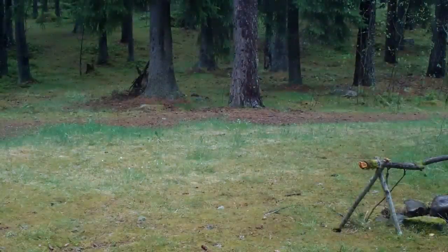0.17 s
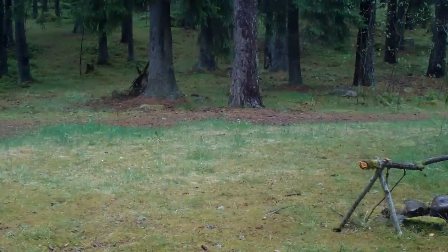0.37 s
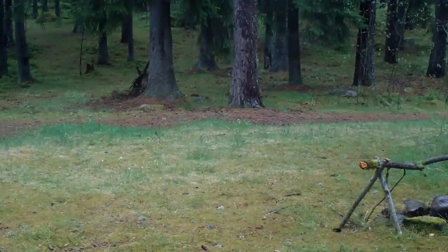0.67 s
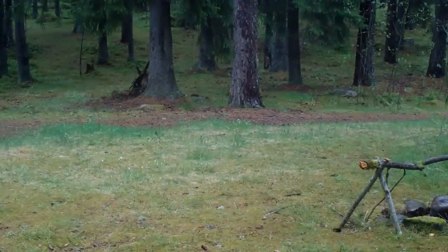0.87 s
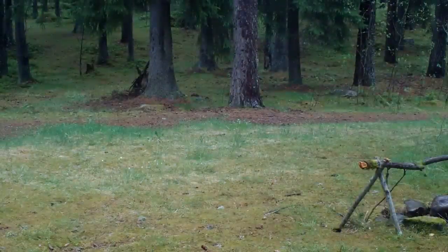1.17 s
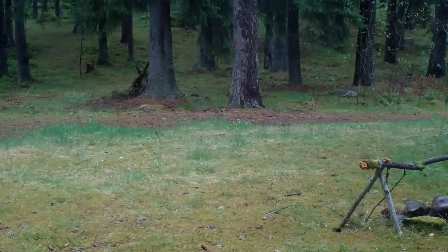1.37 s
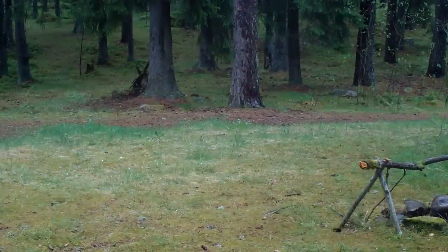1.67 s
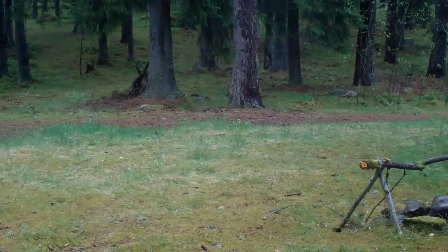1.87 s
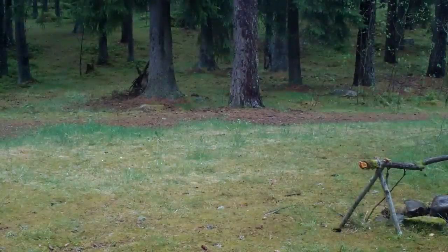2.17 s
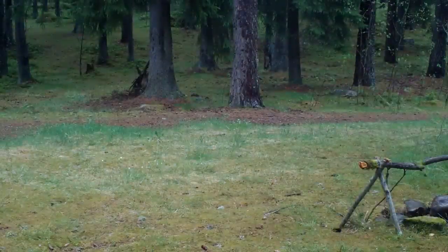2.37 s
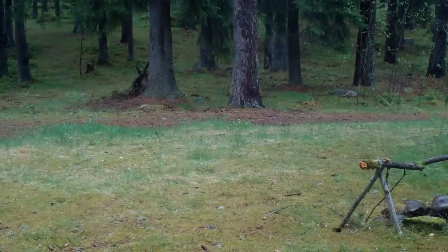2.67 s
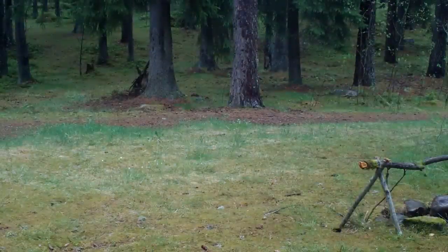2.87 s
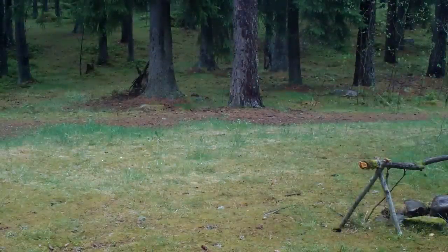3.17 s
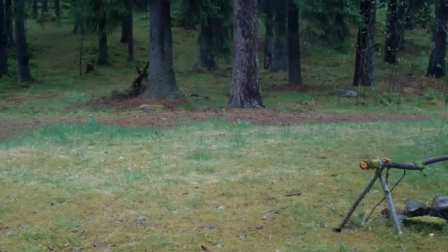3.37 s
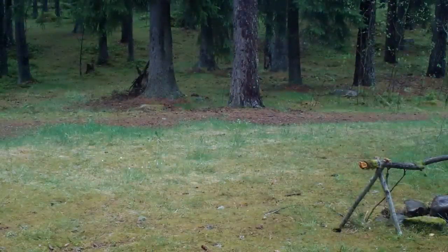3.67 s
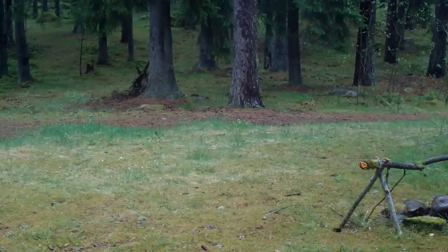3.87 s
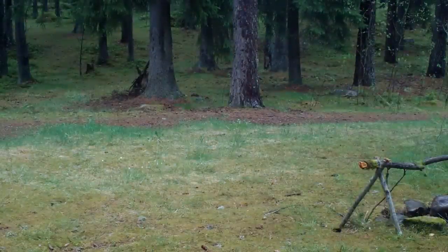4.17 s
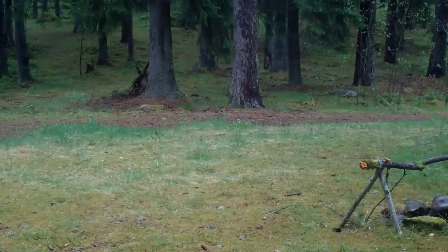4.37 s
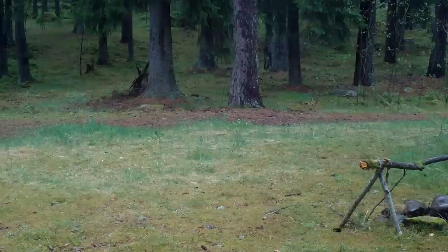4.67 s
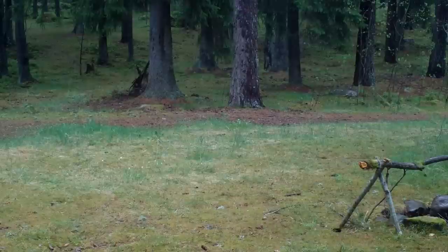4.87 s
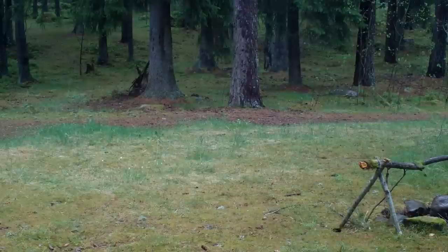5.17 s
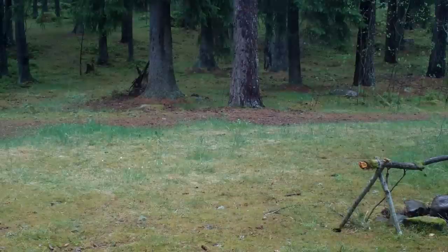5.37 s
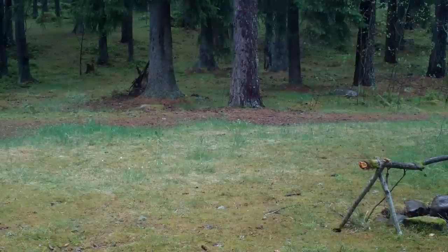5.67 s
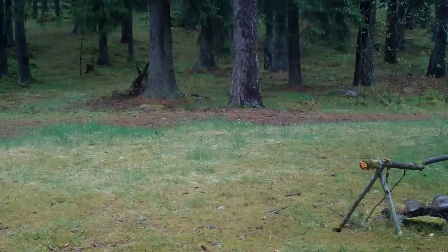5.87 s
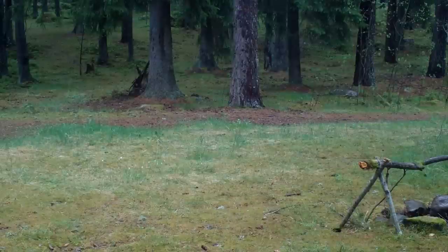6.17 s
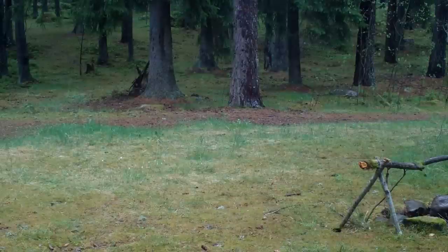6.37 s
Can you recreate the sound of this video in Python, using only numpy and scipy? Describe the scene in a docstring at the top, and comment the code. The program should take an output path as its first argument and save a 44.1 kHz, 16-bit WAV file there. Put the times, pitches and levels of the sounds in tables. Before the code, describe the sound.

Arrows are pushed into a leather quiver up close, with bright clicks, scrapes and one dense rattling burst, in a quiet forest with a distant bird.

```python
"""Arrows pushed into a leather quiver, close to the microphone, in a quiet forest clearing.
Shafts click and chatter (coloured impulse bursts), scrape (random tiny slips) and ring (decaying modes).
Glancing blows chirp along a bent shaft; tips knock and drag in the hollow leather, heard as resonances.
Behind lie a far songbird (gliding, warbled sines with echoes) and forest air with a thin hiss (shaped noise)."""
import sys
import numpy as np
from scipy import signal
from scipy.fft import rfft, irfft, next_fast_len
from scipy.io import wavfile
from scipy.ndimage import uniform_filter1d

SR = 44100
rng = np.random.default_rng(int(sys.argv[2]) if len(sys.argv) > 2 else 0)


def persist_wave(psi):
    """Save psi, clipped to +-1, as 16-bit WAV."""
    counts = np.round(np.clip(psi, -1, 1) * 32767).astype(np.int16)
    wavfile.write(sys.argv[1], SR, np.atleast_2d(counts).T)


N = 287973
T = np.arange(N) / SR

# Clear clicks of shaft on shaft: start_s, level_db (rms over 10 ms),
# chatter_s (half the time of the chatter's fall to 1/e), woody_low_db, sharp_top_db (both added to the spectrum)
SHAFT_CLICKS = [(0.0294, -44, 0.0036, 4.5, 1), (0.4006, -37.5, 0.0022, 5.5, 8), (0.434, -44, .0017, 6, 0),
                (0.462, -39.5, 0.003, 4, 7), (0.4943, -35, .0024, 7, 9), (0.535, -26, 0.0015, 0, 7.5),
                (0.556, -39, .006, 17, 2), (0.5653, -32, 0.0025, 5, 7), (0.5796, -36.5, 0.0032, 17.5, 3),
                (0.5864, -36.5, 0.0024, 12, 3), (0.6171, -33.5, 0.00019, 2, 0),
                (0.6396, -39, 0.0039, -2, -3), (0.6557, -42, 0.00054, -1, -5),
                (1.7003, -30.5, 0.00043, -2, 2), (1.7212, -37, 0.004, 10, 4),
                (1.7293, -35, 0.0015, 10.5, 6), (2.1074, -33, 0.0021, -5, 2),
                (2.1336, -31.5, 0.00055, 3, 7), (2.1384, -26, 0.0023, -1, 5), (2.158, -35, 0.0017, 2, 11),
                (2.668, -40.5, 0.0009, 3, -3), (3.0693, -52.5, .0005, 14, -6),
                (3.2995, -47.5, 0.00068, 11, 0), (3.6788, -30.5, 0.00095, 5, 6),
                (3.6876, -35.5, 0.0012, 0, 6), (3.7049, -45, .001, 8, -3), (3.719, -40, 0.00034, -4, -8),
                (3.77, -35.5, 0.00055, -10, 4), (3.7835, -32.5, 0.00059, 0, 4),
                (3.798, -40, 0.00023, -8, -6), (3.863, -32, 0.0024, -10, 9), (3.9146, -40.5, 0.00049, 3, 8),
                (3.9725, -36, 0.0065, -19, 3), (3.992, -41, 0.0023, -11, 19),
                (4.3057, -24.5, 0.0028, -1, 8), (4.3738, -28.5, 0.0021, -7, -2),
                (4.3805, -24.5, 0.003, -1, 3), (4.391, -23.5, 0.0028, -3, 0),
                (4.3954, -19, 0.0041, -0.5, 7), (4.4213, -23.5, 0.0036, -5, 11),
                (4.4509, -23.5, 0.0034, -3, 11), (4.4565, -26, 0.0044, -12, 13),
                (4.4953, -22, 0.014, -3, 6), (4.5238, -27.5, 0.0061, 6, -3), (4.5474, -22, 0.0038, -1, 9),
                (4.5777, -29.5, 0.016, 4.5, 7), (4.5982, -31, 0.0026, -2, 9), (4.608, -29.5, 0.014, 5.5, 2),
                (4.6318, -28, 0.0026, -9, 8), (4.7113, -43, 0.0032, 2, -8), (4.7178, -41, 0.0022, -1, 0),
                (5.051, -30.5, 0.0029, 4.5, 2), (5.1628, -45, 0.0026, 13, -5), (5.3667, -32, 0.0035, 4, -2),
                (5.3892, -35.5, 0.00053, -4, 5), (5.401, -37, 0.0015, 0, -3),
                (5.4052, -30, 0.0021, -4.5, -4), (5.4193, -37, 0.0015, 6, -1),
                (5.4303, -42.5, 0.0024, 8, 3), (5.471, -41, 0.00042, -7, -2),
                (5.4961, -40.5, 0.0012, 1.5, 3), (5.6429, -38.5, 0.01, 10, 7),
                (5.6548, -19, 0.00033, 1.5, 4), (5.697, -31.5, 0.0026, 1, 3), (5.726, -36, 0.0019, 2, 0),
                (5.7414, -41.5, 0.00035, -1, 6), (5.7555, -43, .0016, -3, 1), (5.904, -51, .0003, 8, 3),
                (5.944, -50, .0003, 2, 4), (6.337, -49.5, 0.001, -1, -1)]
# Common click spectrum: pitch_hz, level_db (relative)
CLICK_SPECTRUM = [(100, -32.5), (400, -27), (1000, -22), (2300, -19.5), (3200, -20), (4500, -15.5),
                  (5800, -7), (6700, -0.5), (7300, 4), (7900, -2), (8700, -9), (10500, -17), (13000, -25.5),
                  (16000, -28)]
# The clicks sink in pitch overall as the arrows settle: time_s, brightest_pitch_hz
CLICK_PITCH = [(3.9, 7670), (4.4, 7380), (5.45, 7300), (5.68, 7000), (5.73, 7150)]
# Shafts and feathers sliding along each other: start_s, length_s (until the release), level_db (of the effort)
SLIDING_STROKES = [(0.29, 0.19, -61), (0.462, 0.095, -47.5), (0.745, 0.091, -60), (1.7, 0.032, -47),
                   (1.85, 0.061, -52), (2.09, 0.064, -44.5), (2.38, 0.087, -55), (2.61, 0.11, -61),
                   (2.965, 0.035, -51.5), (3.2, 0.046, -61.5), (3.48, 0.29, -62.5), (3.848, 0.032, -48.5),
                   (3.92, 0.1, -51.5), (4.04, 0.082, -58), (4.29, 0.054, -45), (4.395, 0.023, -29),
                   (4.427, 0.042, -24.5), (4.482, 0.052, -27.5), (4.55, 0.013, -31), (4.575, 0.089, -46),
                   (5.05, 0.19, -64.5), (5.365, 0.042, -56), (5.63, 0.12, -61)]
# Spectrum of shafts sliding: pitch_hz, level_db (relative)
SCRAPE_SPECTRUM = [(200, -19), (1000, -25.5), (2300, -17), (3500, -14), (5000, -9), (6300, -3), (7300, 4),
                   (8000, -1.5), (8800, -7.5), (10500, -18), (13000, -22), (16000, -50)]
# Spectrum of brushing feathers: pitch_hz, level_db (relative)
FEATHER_SPECTRUM = [(800, -14), (3300, -3), (5500, -4.5), (7300, 7.5), (15000, -17)]
# Bending modes of the shafts: pitch_hz, level_db (relative), t60_s
SHAFT_MODES = [(1840, -4, 0.12), (2270, 4.5, 0.092), (2890, -5, 0.14), (3880, -24, .04), (4840, 0, 0.058),
               (5500, 2.5, 0.072), (6920, 0.5, 0.041), (7370, -6.5, 0.34), (7970, -3, 0.2),
               (9650, 5, 0.091)]
# Glancing blows that bend a shaft: start_s, peak_db (of the chirp alone), travel_s (of its 1 kHz wave)
SHAFT_FLEXES = [(0.5816, -39, 0.002), (0.586, -50, .0015), (1.7003, -40.5, .012), (5.0494, -35, 0.00187),
                (5.6543, -32.5, .001)]
# Blows on the leather: start_s, peak_db
LEATHER_KNOCKS = [(1.718, -34), (2.139, -42.5), (3.68, -37.5), (4.375, -28), (4.381, -26), (4.391, -24.5),
                  (4.413, -25.5), (4.422, -24.5), (4.434, -26), (4.487, -30.5), (4.538, -34), (4.577, -36),
                  (4.625, -32), (4.712, -38), (6.337, -39)]
# Tips dragging on the inside of the quiver: start_s, length_s (until the release), level_db (of the effort)
TIP_DRAGS = [(3.97, 0.23, -49.5), (4.374, 0.084, -36), (4.484, 0.027, -40), (4.52, 0.12, -52)]
# Modes of the leather tube and its air, before softening: pitch_hz, level_db (relative), t60_s
QUIVER_MODES = [(139, 1, 0.044), (230.6, -5.5, 0.11), (293, -3, 0.036), (379, 3.5, 0.036),
                (615, -0.5, 0.059), (830, -3, 0.0081), (1060, -11, 0.0053)]
# Songbird whistles: start_s, length_s, start_hz, middle_hz, end_hz, peak_db (before echoes)
BIRD_WHISTLES = [(1.097, 0.079, 2230, 2280, 2230, -64), (1.264, 0.15, 1940, 2000, 1960, -64),
                 (1.472, .12, 3000, 2800, 3130, -61), (1.545, .09, 3400, 3540, 3370, -66.5),
                 (1.8, 0.085, 2960, 2810, 2610, -63), (2.235, .073, 2790, 2630, 2980, -63),
                 (2.267, 0.08, 2680, 2340, 2200, -61), (2.35, .27, 2310, 2190, 2290, -65)]
# Low notes are warbled, high notes nearly pure: middle_hz, warble (share of the pitch)
WARBLE_DEPTH = [(2200, 0.0437), (2700, 0.0055)]
# Forest air and high hiss: pitch_hz, level_db (relative, per hz)
AIR_SPECTRUM = [(15, -1.5), (28, 1.5), (42, -1.5), (62, -3.5), (110, -11.5), (220, -19), (450, -20.5),
                (850, -21.5), (1400, -29.5), (3000, -36), (5000, -37.5), (6400, -34), (7400, -28),
                (9200, -38.5), (15000, -44)]

FIDGET_DB = -65.5  # effort of the held arrows, never quite still
USUAL_STROKE_DB = -50
ATTACK_S, RELEASE_S = 0.012, 0.024  # swell, and fall to 1/e, of a usual stroke
HASTE = 0.46  # dB of extra speed per dB of extra stroke level
AIR_DB = -48.5  # rms before the slow swaying
TOP_HZ = 15800


def taps(first_hit=1.1, after_db=-21, after_s=0.0088, travel_s=0.001014, size=4096):
    """Each contact is a sharp hit, a quick chatter, then a weak tail of waves running along the shaft."""
    out = np.zeros(N)
    t = np.arange(size) / SR
    hz, click_db = np.transpose(CLICK_SPECTRUM)
    woody = np.interp(hz, [2800, 6000], [1, 0])
    sharp = np.interp(hz, [7900, 11000], [0, 1])
    # Low bending waves are slow and arrive after the bright tick; travel_s is the delay of the lowest
    f = np.fft.rfftfreq(size, 1 / SR)
    late = np.exp(-2j * np.pi * travel_s * 2400 * (1 - np.exp(-f / 2400)))
    tail = undb(after_db) * np.exp(-t / after_s)
    for start_s, level_db, chatter_s, low_db, top_db in SHAFT_CLICKS:
        grains = rng.choice([-1, 1], size) * (rng.random(size) < .5)
        # Holds while the shafts touch, then stops
        chatter = np.exp(-(t / (2 * chatter_s)) ** 2)
        force = grains * (chatter + tail)
        force[0] += first_hit
        # Shift the whole spectrum so that its peak lies at the brightest pitch
        bright_hz = np.interp(start_s, *np.transpose(CLICK_PITCH))
        shifted_hz = hz * bright_hz / hz[np.argmax(click_db)]
        tilted_db = click_db + low_db * woody + top_db * sharp
        click = colour(irfft(rfft(force) * late), np.transpose([shifted_hz, tilted_db]))
        rms_10ms = np.linalg.norm(click) / np.sqrt(SR / 100)
        add(out, start_s, click * undb(level_db) / rms_10ms)
    return out


def slide(catch_db=2.5, brush_db=-8, brush_top_db=-55, tick_db=-4, tick_top_db=-46):
    """Shafts rub, catching and letting go; feathers add duller brushing and stray ticks, capped in level."""
    push = effort(SLIDING_STROKES) + undb(FIDGET_DB)
    rub = friction(push, rate=4000, spread_db=5.5) * undb(catch_db * walk(130))
    scrape = colour(rub, SCRAPE_SPECTRUM) / power_gain(SCRAPE_SPECTRUM)
    # Hard pressure hardly raises the feathers
    brush_push = np.minimum(push * undb(brush_db), undb(brush_top_db))
    tick_push = np.minimum(push * undb(tick_db), undb(tick_top_db))
    brush = friction(brush_push, rate=2500, spread_db=5.5)
    ticks = friction(tick_push, rate=80, spread_db=6)
    feathers = colour(brush + ticks, FEATHER_SPECTRUM) / power_gain(FEATHER_SPECTRUM)
    return scrape + feathers


def flexes(ring_db=-12, size=2048):
    """Bending waves travel as the root of frequency: a short falling chirp that leaves the shaft ringing."""
    out = np.zeros(N)
    khz = np.fft.rfftfreq(size, 1 / SR) / 1000
    band = khz / (.5 + khz) / (1 + (khz / 2.54) ** 4)
    for start_s, peak_db, travel_s in SHAFT_FLEXES:
        lag = 4000 * np.pi * travel_s * np.sqrt(khz)  # phase in radians
        chirp = irfft(band * np.exp(-1j * lag))
        add(out, start_s, undb(peak_db) * chirp / np.abs(chirp).max())
    return out + undb(ring_db) * excite(out, ring(SHAFT_MODES))


def quiver(soft_hz=1300, crumple_s=0.0052, size=4096):
    """Tips knock and drag inside the leather tube, which answers with a dull hollow note."""
    out = np.zeros(N)
    t = np.arange(size) / SR
    soften = signal.butter(1, soft_hz, fs=SR, output="sos")
    body = signal.sosfilt(soften, ring(QUIVER_MODES))
    for start_s, peak_db in LEATHER_KNOCKS:
        crumple = 0.17 * rng.standard_normal(size) * np.exp(-t / crumple_s)
        knock = excite(signal.unit_impulse(size) + crumple, body)
        add(out, start_s, undb(peak_db) * knock / np.abs(knock).max())
    drag = excite(friction(effort(TIP_DRAGS), rate=3000, spread_db=1), body)
    return out + colour(drag, [(120, -12), (240, -7.0), (400, -2), (900, -7.5), (3000, 1.0)])


def effort(strokes):
    """Each stroke swells, holds and dies away; hard strokes start and stop more quickly."""
    out = np.zeros(N)
    for start_s, length_s, level_db in strokes:
        speed = undb(HASTE * (level_db - USUAL_STROKE_DB))
        rise = np.clip((T - start_s) * speed / ATTACK_S, 0, 1)
        fall = np.exp(-np.maximum(T - start_s - length_s, 0) * speed / RELEASE_S)
        out = np.maximum(out, undb(level_db) * rise * fall)
    return out


def friction(gain, rate, spread_db):
    """Tiny random slips of unequal size, rate per second on average, as strong as the given gain."""
    sizes = undb(spread_db * np.minimum(rng.exponential(size=N), 3))
    slips = (rng.random(N) < rate / SR) * rng.choice([-1, 1], N) * sizes
    return unit(slips) * gain


def ring(modes, size=4096):
    """Impulse response of a struck body: decaying modes, cut at size samples, with unit energy."""
    t = np.arange(size) / SR
    y = np.zeros(size)
    for pitch_hz, level_db, t60_s in modes:
        decay = np.exp(-np.log(1000) * t / t60_s)
        y += undb(level_db) * np.cos(2 * np.pi * pitch_hz * t) * decay
    return y / np.linalg.norm(y)


def excite(x, response):
    """Play a force through an impulse response."""
    return signal.fftconvolve(x, response)[:len(x)]


def echoes(x, t60_s, size):
    """Diffuse fading reflections from ground and trees: decaying noise with unit energy."""
    tail = rng.standard_normal(size) * np.exp(-np.log(1000) * np.arange(size) / SR / t60_s)
    return excite(x, tail / np.linalg.norm(tail))


def bird(echo_t60_s=0.77, echo_db=-5, size=32768):
    """Arched and warbled whistles, smeared by echoes from the trunks."""
    out = np.zeros(N)
    wobble = walk(140)
    for start_s, length_s, start_hz, middle_hz, end_hz, peak_db in BIRD_WHISTLES:
        u = np.linspace(0, 1, int(length_s * SR))
        arch = np.polyval(np.polyfit([0, .5, 1], [start_hz, middle_hz, end_hz], 2), u)
        depth = np.interp(middle_hz, *np.transpose(WARBLE_DEPTH))
        pitch_hz = arch * (1 + depth * wobble[int(start_s * SR):][:len(u)])
        whistle = np.sin(2 * np.pi * np.cumsum(pitch_hz) / SR)
        add(out, start_s, undb(peak_db) * np.sin(np.pi * u) * whistle)
    return out + undb(echo_db) * echoes(out, echo_t60_s, size)


def air(gust_db=0.5, sway_db=1.15):
    """Forest hush with a thin high hiss, swaying slowly; the low rumble swells in light gusts."""
    hush = unit(colour(rng.standard_normal(N), AIR_SPECTRUM))
    rumble = signal.sosfilt(signal.butter(1, 90, fs=SR, output="sos"), hush)
    gusts = rumble * undb(gust_db * walk(6.1))
    hiss = (hush - rumble) * undb(sway_db * walk(3.15))
    return undb(AIR_DB) * (gusts + hiss)


def walk(rate):
    """Smooth random wander with a spread near 1, taking rate new values per second."""
    k = int(SR / rate)
    steps = np.repeat(rng.standard_normal(N // k + 1), k)
    return 1.75 * uniform_filter1d(steps, k)[:N]


def colour(x, points):
    """Causal filter with a (hz, db) spectrum, made from the cepstrum of its log gain."""
    hz, db = np.transpose(points)
    f = np.maximum(np.fft.rfftfreq(2 * next_fast_len(len(x)), 1 / SR), 1)
    log_gain = np.log(undb(np.interp(np.log(f), np.log(hz), db)))
    cepstrum = irfft(log_gain)
    # Fold the second half onto the first, for minimum phase
    cepstrum[1:len(f) - 1] *= 2
    cepstrum[len(f):] = 0
    response = np.exp(rfft(cepstrum))
    return irfft(rfft(x, len(cepstrum)) * response)[:len(x)]


def power_gain(points, size=2048):
    """Rms gain of a colour for white noise."""
    return np.linalg.norm(colour(signal.unit_impulse(size), points))


def undb(db):
    """Decibels to gain."""
    return 10 ** (np.asarray(db) / 20)


def unit(x):
    """Scale to rms 1."""
    return x / np.sqrt(np.mean(x ** 2))


def add(out, start_s, x):
    """Mix x into out from start_s."""
    i = max(int(start_s * SR), 0)
    out[i:i + len(x)] += x[:N - i]


def scene(ring_db=-22, scatter_db=-26, scatter_t60_s=0.23, size=16384):
    """Clicks and sliding ring the shafts; ground and trees scatter a little of all the near sound back."""
    contacts = taps() + slide()
    ringing = undb(ring_db) * excite(contacts, ring(SHAFT_MODES))
    near = contacts + ringing + flexes() + quiver()
    scatter = undb(scatter_db) * echoes(near, scatter_t60_s, size)
    return (near + scatter + bird() + air())[None]


def record(dry):
    """The recorder cuts the top with a steep low-pass."""
    return signal.sosfilt(signal.ellip(8, .2, 70, TOP_HZ, fs=SR, output="sos"), dry)


dry = scene()
out = record(dry)
persist_wave(out)
```